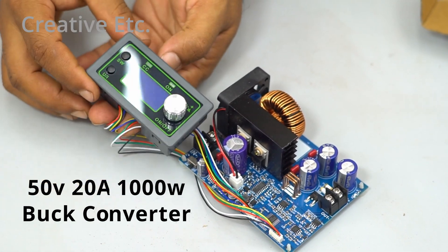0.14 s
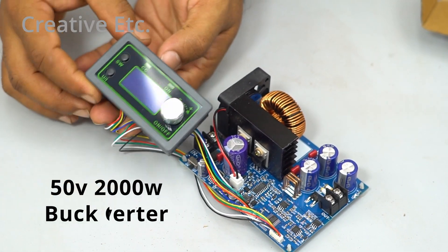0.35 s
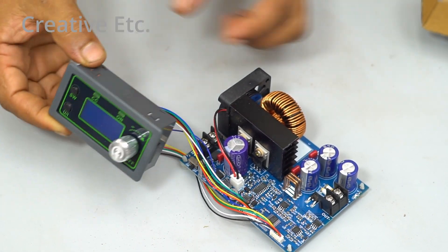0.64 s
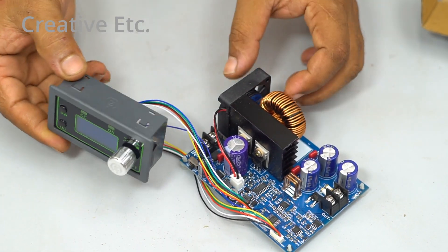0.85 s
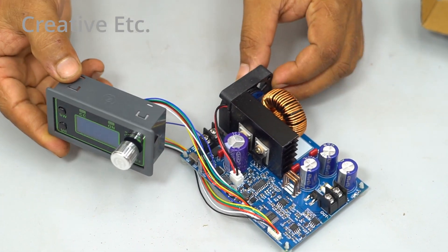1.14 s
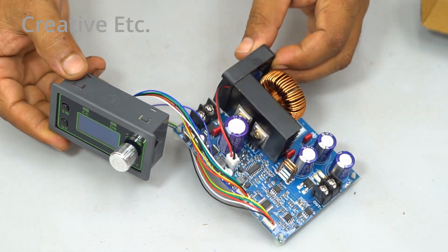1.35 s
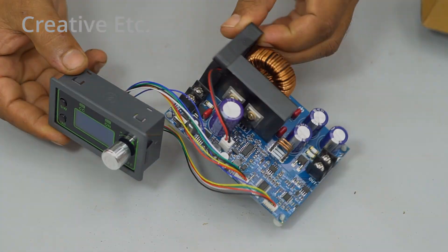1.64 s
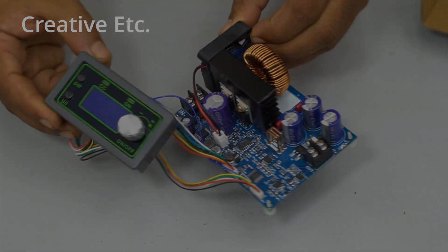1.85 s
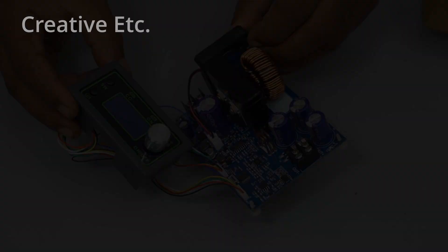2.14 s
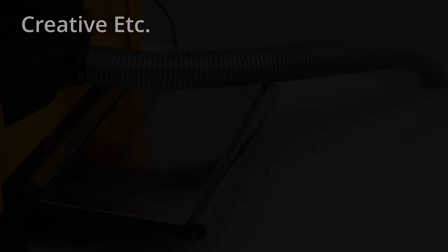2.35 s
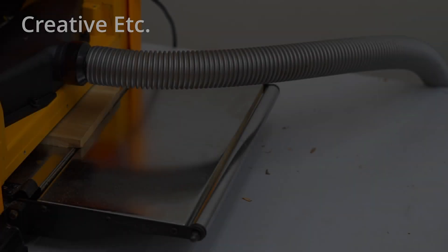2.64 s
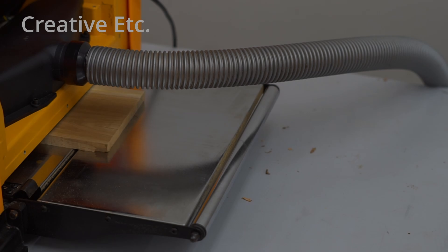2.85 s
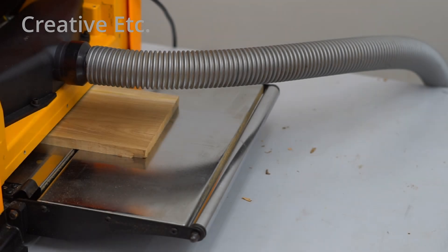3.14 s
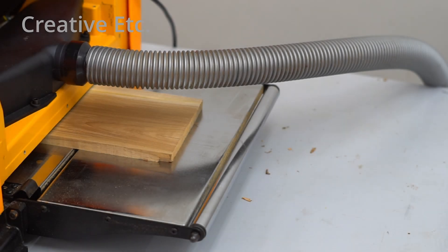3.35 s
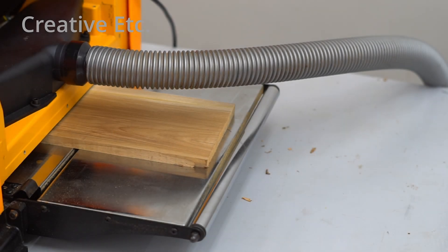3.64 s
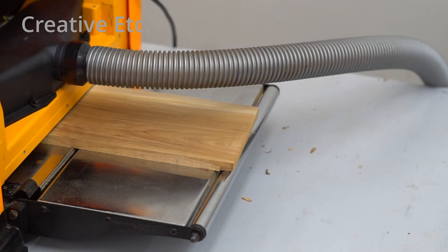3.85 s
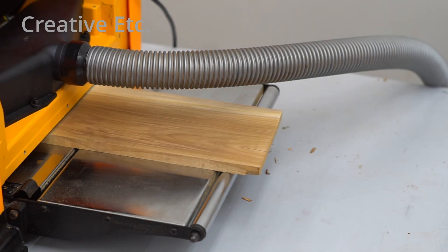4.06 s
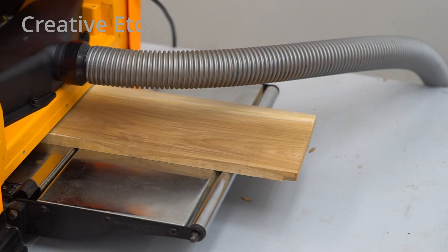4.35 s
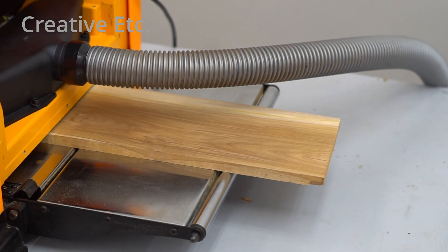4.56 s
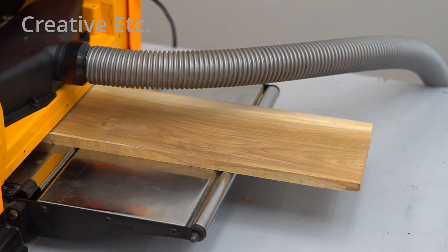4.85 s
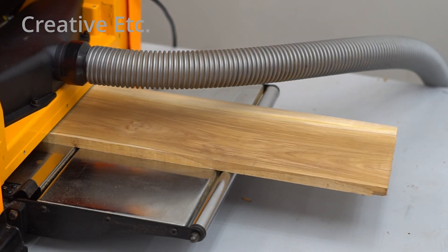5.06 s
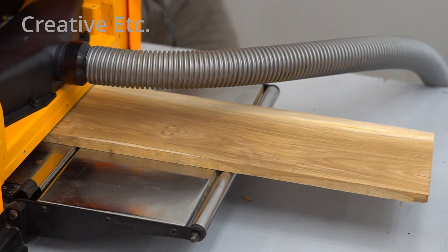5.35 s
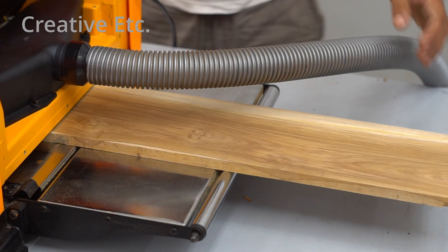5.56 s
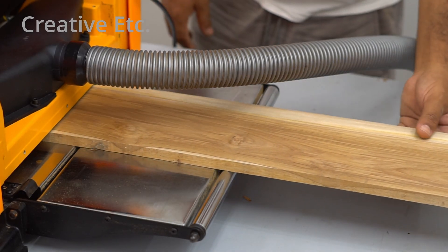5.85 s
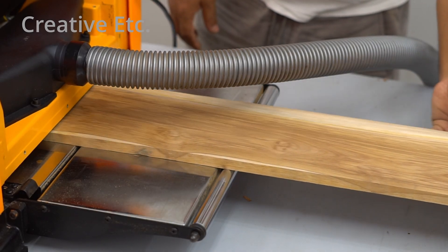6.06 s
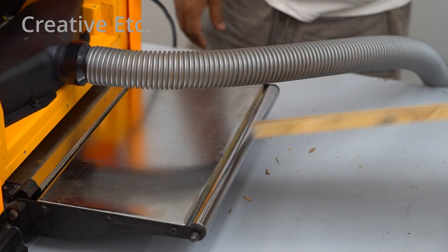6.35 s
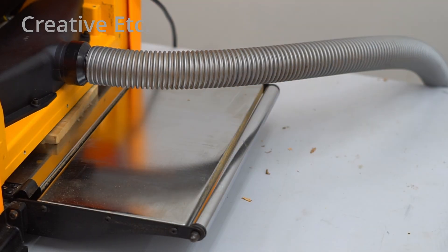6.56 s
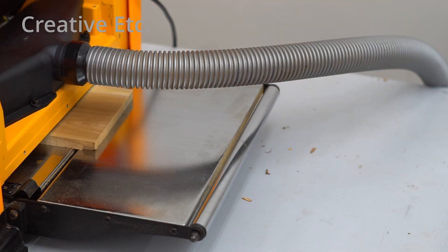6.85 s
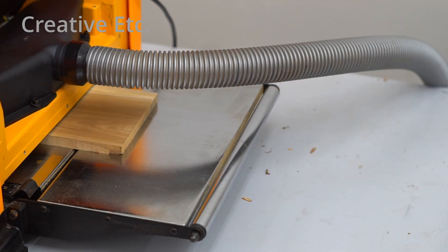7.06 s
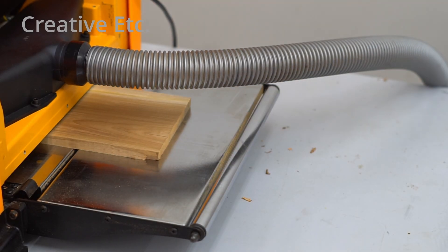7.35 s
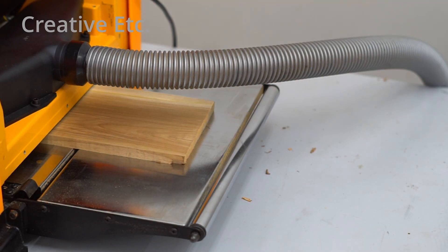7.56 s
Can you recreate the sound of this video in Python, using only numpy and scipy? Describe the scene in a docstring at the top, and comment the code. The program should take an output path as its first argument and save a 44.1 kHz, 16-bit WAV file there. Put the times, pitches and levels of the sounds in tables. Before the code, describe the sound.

For the first 2.3 seconds it is quiet: a low room rumble and a high insect trill from outside, which grows stronger at about 0.6 seconds. Very faint distant horns sound. Fingers softly rub a circuit board and wires, with small bright ticks near 0.5, 1.5 and 2 seconds.

At 2.3 seconds a thickness planer cuts in abruptly, close and far louder, already cutting wood. Its knives make a buzzing growl with a ringing shriek above it, over hissing chips and fan rumble. The pitch sags under the load until about 4.7 seconds, then climbs again, and the tone turns briefly hollow several times. At 5.8 seconds the board runs out and the motor spins up freely with a hum, a thin whine and rushing air. At 6.4 seconds a second pass bites suddenly, the pitch falling again as the cutting continues to the end at about 7.7 seconds.

```python
"""Quiet bench, then a thickness planer

Fingers tap and rub a circuit board while insects trill outside and far horns sound.
A planer cuts in abruptly: knife blows ring its housing and the wood, the motor sags under the load
and chips hiss away. The board runs out, the motor spins up freely with a thin whine,
and a second pass bites just as abruptly."""
import sys
import numpy as np
from scipy import signal
from scipy.fft import rfft, irfft, next_fast_len
from scipy.io import wavfile

SR = 44100
rng = np.random.default_rng(int(sys.argv[2]) if len(sys.argv) > 2 else 0)


def waveform_to_disk(signal):
    """Save audio, clipped to [-1, 1], as 16-bit WAV at the path in sys.argv[1]."""
    frames = np.transpose(np.atleast_2d(signal))
    scaled = np.clip(frames, -1, 1) * 32767
    samples = np.round(scaled).astype(np.int16)
    wavfile.write(sys.argv[1], SR, samples)


N = 340452
TIME = np.arange(N) / SR
PLANER_ON_S, BOARD_OUT_S, SECOND_PASS_S = 2.316, 5.80, 6.435
FREE_SPEED_HZ = 187  # knife blows per second that the unloaded cutter heads for

# Force of the cut, one list a pass. Each row: time in seconds, growl and shriek in relative dB.
CUT_FORCE = [
    [(2.33, -13, -16), (2.44, -15.5, -19.5), (2.55, -15.5, -14), (2.62, -17.5, -16), (3.06, -14.5, -18.5),
     (3.74, -19.5, -19.5), (4.12, -20, -17), (4.5, -14.5, -22.5), (4.6, -17.5, -16.5), (5.0, -17.5, -19.5),
     (5.36, -18.5, -17), (5.48, -23, -17.5), (5.7, -20, -22), (5.79, -28.5, -28)],
    [(6.46, -14, -16.5), (6.652, -20, -15), (7.036, -17.5, -15.5), (7.104, -16.5, -19.5),
     (7.7, -18.5, -18.5)],
]


def from_db(db):
    """Decibels to gain."""
    return 10 ** (np.asarray(db) / 20)


def rms_one(x):
    """Scale to unit rms."""
    return x / np.sqrt(np.mean(np.abs(x) ** 2) + 1e-20)


def in_time(rows, t=TIME):
    """Columns of a curve table at the times t."""
    times, *columns = np.transpose(rows)
    return [np.interp(t, times, column) for column in columns]


def step(at_s, rise_s, t=TIME):
    """A ramp from 0 to 1 centred on a moment."""
    return np.clip((t - at_s) / rise_s + .5, 0, 1)


def drift(rate_hz, t=TIME):
    """A smooth random wobble with a spread of about 1."""
    hop = 40
    pole = np.exp(-2 * np.pi * hop * rate_hz / SR)
    slow = signal.lfilter([1], [1, -2 * pole, pole * pole], rng.standard_normal(N // hop + 2002))[2000:]
    return np.interp(t * SR / hop, np.arange(len(slow)), rms_one(slow))


def noise(colour, width=0.98):
    """Stereo noise coloured by a gain over frequency; the mid signal has rms 1."""
    size = next_fast_len(N)
    gain = colour(np.arange(size // 2 + 1) * SR / size + 1)
    mid, side = (rms_one(irfft(rfft(rng.standard_normal(size)) * gain, size)[:N]) for _ in range(2))
    return mid + width * side * np.array([[1], [-1]])


def slope(points):
    """Gain over frequency through (Hz, dB) points, falling away outside them."""
    hz, db = np.transpose(points)
    return lambda f: (from_db(np.interp(np.log(f), np.log(hz), db))
                      * np.minimum(f / hz[0], 1) * np.minimum(hz[-1] / f, 1) ** 2)


def resonant(modes, f):
    """Gain of a set of steep-sided resonances."""
    return np.sqrt(sum((from_db(db) / (1 + (2 * (f - hz) / width) ** 2)) ** 2 for hz, width, db in modes))


def chorus(bands):
    """Gain over frequency of resonances whose dB sets their share of the power."""
    return lambda f: resonant([(hz, width, db - 10 * np.log10(width)) for hz, width, db in bands], f)


def insects(join_s=.565, throb_db=.5):
    """Many insects blur into one trill, soft at first, until more join in."""
    # The trill and its overtones. Each row: centre in Hz, width in Hz, relative power in dB.
    trill_bands = [(3860, 154, 2), (3730, 3, -14), (3626, 150, -3), (3130, 250, -22)]
    overtone_bands = [(6790, 1000, 1.5), (7580, 290, -4.5), (8060, 980, -9)]
    trill_db = -55 + 10 * step(join_s, 0.062) + throb_db * drift(13)
    trill = from_db(trill_db) * noise(chorus(trill_bands), width=0.23)
    return trill + from_db(-58 + throb_db * drift(6)) * noise(chorus(overtone_bands), width=1.1)


def room_tone():
    """An uneven low rumble under soft air and two thin, steady tones."""
    # Rumble fader. Each row: time in seconds, level in dB.
    rumble_levels = [(0.0, -49.5), (0.18, -51), (1.46, -61.5), (1.47, -64), (1.87, -61), (2.26, -58.5)]
    # Colours of rumble and air. Each row: frequency in Hz, relative level in dB.
    rumble_colour = [(25, -5.5), (50, 7), (90, -8), (160, -11.5), (300, -24), (800, -32.5)]
    air_colour = [(100, -11), (250, -10), (600, -5), (1000, -15), (2000, -14), (5000, -14), (10000, -13),
                  (12000, -20), (15500, -15)]
    # High tones. Each row: pitch in Hz, level in dB.
    thin_tones = [(14885, -79), (15089, -80)]
    out = from_db(in_time(rumble_levels)[0] + 3.2 * drift(22)) * noise(slope(rumble_colour), width=1.5)
    out += from_db(-64 + 0.49 * drift(9.6)) * noise(slope(air_colour))
    for hz, db in thin_tones:
        out += np.sqrt(2) * from_db(db) * np.sin(2 * np.pi * hz * TIME)
    return out


def hand_rubs():
    """Skin and wires slide in short, dull swishes."""
    # Each row: peak time in seconds, half-length in seconds, centre in Hz, level in dB.
    rubs = [(0.022, 0.071, 1250, -65.5), (.12, 0.25, 156, -55), (0.298, .04, 1700, -72),
            (.46, 0.022, 1140, -66), (0.51, 0.048, 249, -67), (0.858, 0.054, 510, -69),
            (1.083, 0.073, 490, -67), (1.296, 0.05, 1900, -71), (1.457, .035, 1680, -64),
            (1.464, .04, 270, -64), (1.876, 0.039, 330, -62), (2.12, 0.09, 395, -69)]
    out = 0
    for peak_s, half_s, hz, db in rubs:
        swell = np.exp(-((TIME - peak_s) / half_s) ** 2)
        out += from_db(db) * swell * noise(chorus([(hz, hz / 2, 0)]))
    return out


def far_horns():
    """Each distant horn arrives as one faint, wavering tone."""
    # Each row: start in seconds, end in seconds, pitch in Hz, level in dB.
    honks = [(.07, 0.43, 682, -66.5), (.22, .8, 572, -65), (.45, 0.952, 755, -71), (1.2, 1.9, 752, -76.5)]
    out = 0
    for start, end, hz, db in honks:
        gate = step(start, .06) - step(end, 0.1)
        out += np.sqrt(2) * from_db(db) * gate * np.sin(2 * np.pi * hz * TIME + 1.1 * drift(10))
    return out


def finger_taps():
    """Fingers on plastic and wire make bright ticks that die fast."""
    # Each row: start in seconds, level in dB, seconds to fall by 60 dB.
    taps = [(.452, -50, 0.1), (.485, -48, .12), (.503, -55, .12), (1.505, -42.5, .05), (1.885, -54, .04),
            (2.005, -52, .06)]
    # Colour of a tick. Each row: frequency in Hz, relative level in dB.
    tick_colour = [(200, -4), (1200, -7), (2500, -7), (4600, 7), (8000, 2), (12000, -3), (16000, -10)]
    envelope = sum(step(start, .002) * from_db(db - 60 * np.clip((TIME - start) / decay, 0, 2))
                   for start, db, decay in taps)
    return envelope * noise(slope(tick_colour))


def hollowed(x, depth=0.92, bass_dip_db=-22):
    """The sound turns hollow as a narrow band, or the whole bass, sinks for a moment."""
    # Band dips. Each row: start in seconds, end in seconds, centre in Hz, width in Hz.
    hollows = [(1.26, 1.375, 3560, 303), (3.876, 4.197, 1420, 187), (4.365, 4.465, 1400, 130)]
    # Bass dips. Each row: start in seconds, end in seconds, upper edge in Hz.
    bass_gaps = [(2.79, 3.057, 356), (3.678, 4.054, 366), (4.084, 4.327, 360), (5.42, 5.504, 260),
                 (6.44, 6.844, 410)]
    for start, end, hz, width in hollows:
        bandpass = signal.butter(2, [hz - width / 2, hz + width / 2], "band", fs=SR, output="sos")
        x = x - depth * (step(start, 0.034) - step(end, .03)) * signal.sosfiltfilt(bandpass, x)
    for start, end, hz in bass_gaps:
        bass = signal.sosfiltfilt(signal.butter(8, hz, fs=SR, output="sos"), x)
        x = x - (1 - from_db(bass_dip_db)) * (step(start, .03) - step(end, .03)) * bass
    return x


def by_pass(passes, t=TIME):
    """Columns of a pair of curve tables; the second takes over as the board enters again."""
    first, second = (in_time(rows, t) for rows in passes)
    return np.where(t < SECOND_PASS_S, first, second)


def unloaded(t, release_s):
    """1 while the cutter runs free: the board leaves gradually and enters at once."""
    return step(BOARD_OUT_S, release_s, t) - step(SECOND_PASS_S, 0.0069, t)


def knife_rate(t, spin_up_s=.31):
    """Blows per second: the board drags the motor down; between passes it recovers, ever more slowly."""
    # Speed under load, one list a pass. Each row: time in seconds, knife blows per second.
    loaded_rates = [
        [(2.32, 166.7), (2.41, 164.3), (2.79, 157.1), (2.92, 155.3), (3.1, 151.4), (3.82, 142.0), (4.06, 143.2),
         (4.54, 141.3), (4.61, 138.7), (4.72, 137.1), (4.84, 137.9), (4.97, 140.4), (5.2, 143.9), (5.39, 148.6),
         (5.55, 156.4), (5.75, 163.1)],
        [(6.45, 165.7), (7.292, 150.0), (7.632, 146.1), (7.71, 144.8)],
    ]
    recovery_s = np.maximum(t - loaded_rates[0][-1][0], 0) * (t < SECOND_PASS_S)
    sag_hz = FREE_SPEED_HZ - by_pass(loaded_rates, t)[0]
    return FREE_SPEED_HZ - sag_hz * np.exp(-recovery_s / spin_up_s)


def echoes(spread_s, count=14):
    """Complex response over frequency of a handful of wall reflections."""
    delays, grid_hz = rng.uniform(0, spread_s, count), np.arange(0, 8000, 2)
    response = rms_one(np.exp(2j * np.pi * (rng.random(count) - grid_hz[:, None] * delays)).sum(1))
    return lambda f: np.interp(f, grid_hz, response)


def harmonic_swells(t, hz, reach_hz=120):
    """Knife harmonics near a given pitch swell briefly."""
    # Each row: peak time in seconds, half-length in seconds, centre in Hz, gain in dB.
    swells = [(2.417, 0.019, 2190, 13), (2.6, 0.41, 806, 9.5), (2.603, 0.35, 1320, 4.5),
              (2.93, 0.051, 1240, 7), (3.02, .1, 457, 6), (3.146, .07, 890, -1.5), (3.51, 0.055, 587, 3),
              (3.98, 0.17, 840, 6), (4.06, 0.12, 1740, 4.5), (4.4, 0.18, 585, 8), (4.696, 0.13, 1235, 6.5),
              (4.73, 0.12, 1840, 6.5), (5.14, 0.25, 1440, 7.5), (5.17, 0.06, 1870, 2),
              (5.345, 0.064, 453, 14.5), (5.637, .12, 326, 9), (6.536, 0.087, 985, 5.5),
              (6.65, .14, 1930, 5), (6.936, 0.12, 1710, 6), (7.15, 0.12, 1220, 2), (7.6, .09, 550, 14)]
    return from_db(sum(db * np.exp(-((t - peak_s) / half_s) ** 2 - ((hz - centre) / reach_hz) ** 2)
                       for peak_s, half_s, centre, db in swells))


def knives(t, cycles, wet=0.34, wander=.36, flutter=.14, shriek_above_hz=1620, width=1.45, lean=0.28):
    """Each blow repeats the last: its harmonics slide through fixed resonances as the motor sags."""
    # Resonances of housing, tables and board, and the thin steel hood's bright shelf.
    # Each row: centre in Hz, width in Hz, relative level in dB.
    body_modes = [(292.2, 14, -11.5), (329, 20.4, -13.5), (458.2, 8.7, -7.5), (553, 256, -18),
                  (563.1, 13.2, -3), (664.4, 13, 1), (692, 92, -7.5), (779, 55, -15.5), (851.4, 43, -4.5),
                  (904, 31, -2.5), (957.7, 18, 0), (980.3, 8.7, 3), (1025, 50, -14), (1100, 28, -11.5),
                  (1138, 21, -5.5), (1236, 72, -7.5), (1345.5, 13.5, 0.7), (1450, 830, -13),
                  (1655, 14, -6.5), (1677, 5.5, 1.5), (1722, 37, -7), (1780, 60, -5.5), (1864, 5, 2),
                  (1973, 126, -7.5), (2059, 16, -4.5), (2295, 1100, -12.5), (2440, 16, -6), (2642, 15, -6),
                  (2752, 21, -4), (3025, 98, -15)]
    hood_modes = [(2800, 670, -23.5), (4050, 3900, -24.5)]
    slow = t[::64]
    orders = np.arange(2, 44)[:, None]
    hz = orders * knife_rate(slow)
    walls, across = echoes(.02), echoes(0.007)

    def wobble(rate_hz):
        """Each harmonic drifts on its own in level and phase."""
        return np.array([drift(rate_hz, slow) + 1j * drift(rate_hz, slow) for _ in orders])

    # the grain of the wood changes the blow slowly
    harmonics = resonant(body_modes + hood_modes, hz) * (1 + wet * walls(hz) + wander * wobble(7))
    # ringing smears each blow over the whole cycle, so the harmonics do not peak together
    harmonics *= np.exp(2j * np.pi * rng.random(orders.shape))
    harmonics *= harmonic_swells(slow, hz)
    # the force of the cut sets the level of two registers; each surges a little with the grain
    growl_db, shriek_db = by_pass(CUT_FORCE, slow)
    upper = step(shriek_above_hz, 60, hz)
    gain = 0
    for share, db in [(1 - upper, growl_db - 0.78), (upper, shriek_db - 1)]:
        register_rms = np.sqrt((share * np.abs(harmonics) ** 2).sum(0) / 2)
        gain += share * from_db(db + 0.74 * drift(7.4, slow)) / register_rms
    # splinters add a quick flutter; high harmonics feel it most
    harmonics *= gain * (1 + flutter * np.sqrt(orders / 10) * wobble(30))
    # reflections reach the two ears with a different phase and level at each frequency
    skew = across(hz) + 0.24 * wobble(3.7)
    sides = harmonics * (1j * width * np.tanh(2 * skew.real) + lean * skew.imag)
    mid, side = 0, 0
    partial = fundamental = np.exp(2j * np.pi * cycles)
    for mid_gain, side_gain in zip(harmonics, sides):
        partial = partial * fundamental  # next harmonic up
        mid += (np.interp(t, slow, mid_gain) * partial).real
        side += (np.interp(t, slow, side_gain) * partial).real
    return (1 - unloaded(t, 0.024)) * (mid + side * np.array([[1], [-1]]))


def motor(t, cycles, waver=0.69, loaded_db=-22):
    """Cutter block and motor hum, the commutator adds a fuzzy whine; both come up between the passes."""
    # Hum and whine; the motor turns about 1.5 times per blow.
    # Each row: multiple of the knife rate, free-running level in dB.
    hum_orders = [(1, -48), (1.47, -44), (1.93, -46), (3, -32), (4, -34.5), (5, -41), (9.1, -46),
                  (10.25, -38), (11.2, -43), (13, -42), (16.75, -44), (23.25, -44)]
    whine_orders = [(29.75, -38.5), (59.5, -40), (89.25, -51)]
    out = np.zeros((2, len(t)))
    for ear in out:
        for order, db in hum_orders:
            level = np.sqrt(2) * from_db(db) * (1 + waver * drift(5.8, t))
            ear += level * np.sin(2 * np.pi * order * cycles + drift(1.76, t))
        for order, db in whine_orders:
            phase = 2 * np.pi * order * cycles
            ear += from_db(db) * (drift(30, t) * np.cos(phase) + drift(30, t) * np.sin(phase))
    return out * from_db(loaded_db * (1 - unloaded(t, 0.058)))


def chips(cycles, air_db, pulse_depth=0.065):
    """Wood tears at each blow and chips spray the hood; with no board the knives only stir the air."""
    # Chip flow, one list a pass. Each row: time in seconds, hiss and fine dust in relative dB.
    chip_flow = [
        [(2.33, -24, -35), (2.69, -24.5, -36), (2.83, -24.5, -31), (3.07, -24.5, -35), (3.34, -25.5, -31.5),
         (3.56, -21.5, -27.5), (4.06, -26, -33.5), (4.12, -24, -32), (4.5, -23, -30.5), (4.65, -25, -35),
         (5.23, -22, -31), (5.37, -24.5, -35.5), (5.68, -20, -23), (5.77, -24.5, -35.5)],
        [(6.46, -24.5, -35.5), (6.724, -23.5, -35), (7.444, -25, -31), (7.478, -23.5, -29), (7.7, -22, -28.5)],
    ]
    # Colours of tearing, hiss and dust. Each row: frequency in Hz, relative level in dB.
    tear_colour = [(60, -45), (200, -48), (330, -36), (550, -7), (900, -1.5), (1400, -2), (2000, 4),
                   (2800, -9), (4000, -30), (7000, -46)]
    hiss_colour = [(1500, -7), (2600, 1), (3600, -0.5), (5000, -5.5), (7000, -7.5), (9000, -15.5),
                   (14000, -36)]
    dust_colour = [(4000, -28), (7000, -3.5), (9000, -0.5), (11000, -3), (13500, -6), (16000, -12)]
    free = unloaded(TIME, 0.094)
    cutting = 1 - free
    hiss_db, dust_db = by_pass(chip_flow)
    hiss_db = cutting * hiss_db + free * (air_db - 28)
    dust_db = cutting * dust_db + free * (air_db - 33.5)
    gust_db = 1.3 * drift(7)
    pulses = rms_one(np.exp(pulse_depth * cutting * np.cos(2 * np.pi * cycles)))
    # the tearing grows louder as the cut bites
    growl_db = by_pass(CUT_FORCE)[0]
    bite_db = cutting * (growl_db - np.median(growl_db[TIME > PLANER_ON_S]))
    tearing = from_db(hiss_db - 1.5 + .5 * bite_db + 2 * free) * noise(slope(tear_colour), width=1.0)
    spray = from_db(hiss_db - 0.4 + .5 * (gust_db + drift(32))) * noise(slope(hiss_colour))
    spray += from_db(dust_db + 0.25 + drift(140) + gust_db) * noise(slope(dust_colour))
    return pulses * (tearing + spray * from_db([[.6], [-.6]]))


def fan(rate, air_db, usual_rate_hz=148.7, strain_db_per_hz=0.33, buffet_db=1.5):
    """Fan and frame rumble harder as the motor labours, and swell with speed once the board is out."""
    # Colour of the rumble. Each row: frequency in Hz, relative level in dB.
    fan_colour = [(30, -22), (70, -22), (115, -5.5), (145, -22), (180, -2), (280, 6), (500, 4), (1000, -1),
                  (2000, -19), (5000, -22)]
    free = unloaded(TIME, .1)
    loaded_db = -45.5 + strain_db_per_hz * (usual_rate_hz - rate)
    level_db = (1 - free) * loaded_db + free * (air_db - 33.5) + buffet_db * drift(15)
    return from_db(level_db) * noise(slope(fan_colour), width=0.62)


def planer(air_db_per_hz=0.39):
    """Knives, motor, chips and fan all follow one spinning shaft."""
    rate = knife_rate(TIME)
    cycles = np.cumsum(rate) / SR  # one cycle per knife blow
    air_db = air_db_per_hz * (rate - FREE_SPEED_HZ)  # a slower cutter stirs less air
    out = chips(cycles, air_db) + fan(rate, air_db)
    on = TIME > PLANER_ON_S - .02
    tones = knives(TIME[on], cycles[on]) + motor(TIME[on], cycles[on])
    out[:, on] += tones * from_db([[.25], [-.25]])
    return out


def scene():
    """The quiet bench gives way at once to the planer."""
    bench = insects() + room_tone() + far_horns() + finger_taps() + hand_rubs()
    running = step(PLANER_ON_S, 0.015)
    return hollowed((1 - running) * bench + running * planer())


def record(dry):
    """Peaks clip at full scale and a steep low-pass takes off the very top."""
    lowpass = signal.cheby2(20, 60, 16300, fs=SR, output="sos")
    return signal.sosfilt(lowpass, np.clip(dry, -1, 1))


dry = scene()
out = record(dry)
waveform_to_disk(out)
```